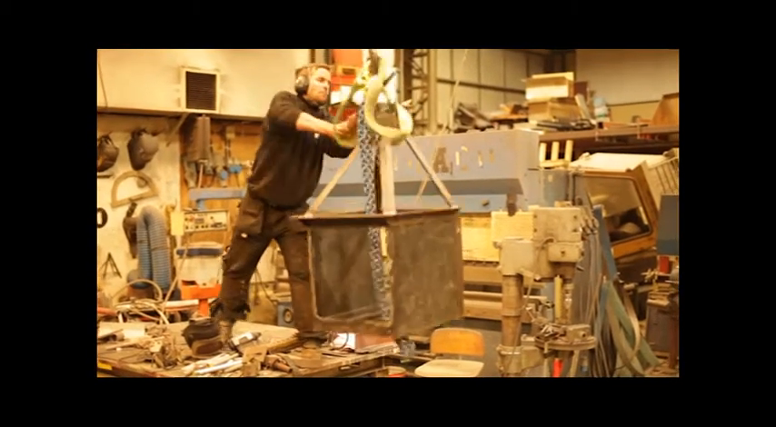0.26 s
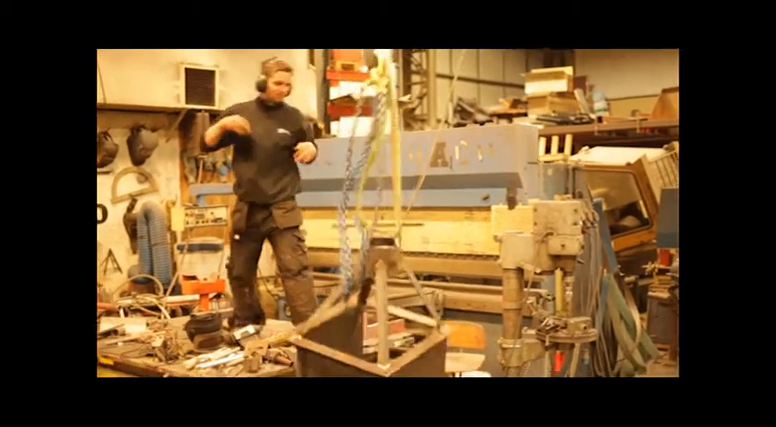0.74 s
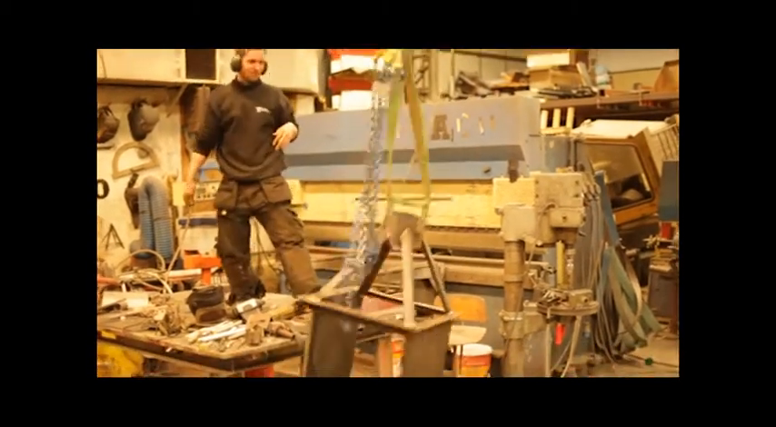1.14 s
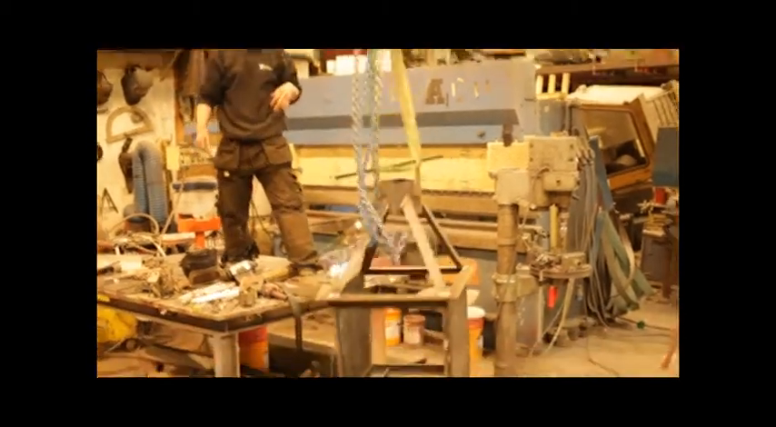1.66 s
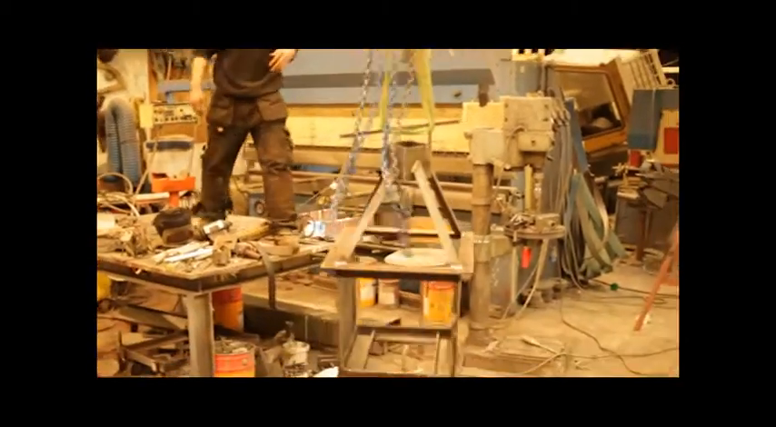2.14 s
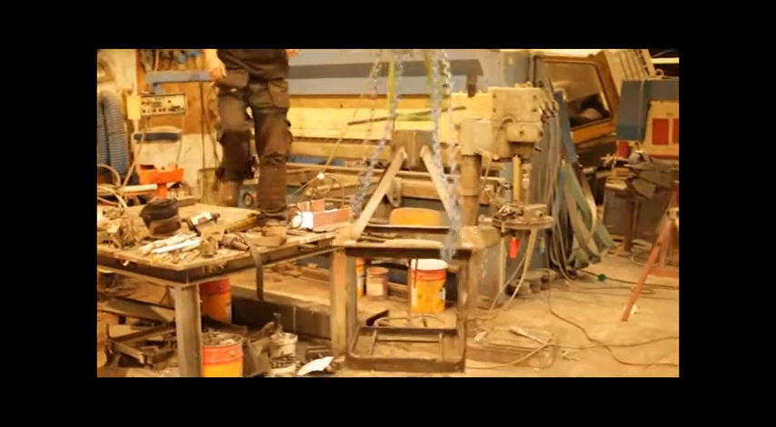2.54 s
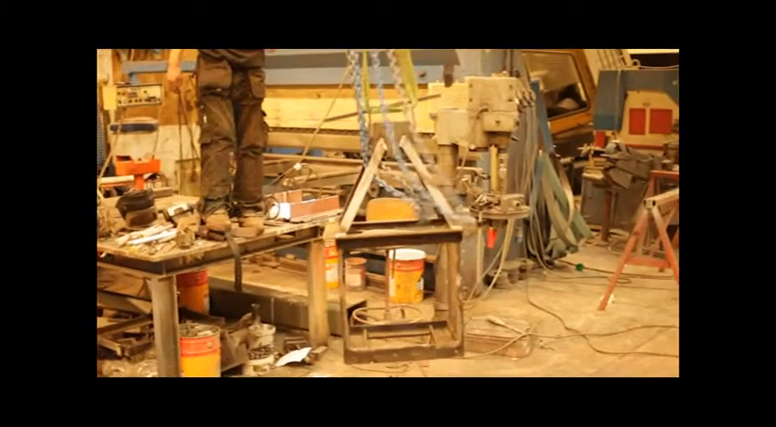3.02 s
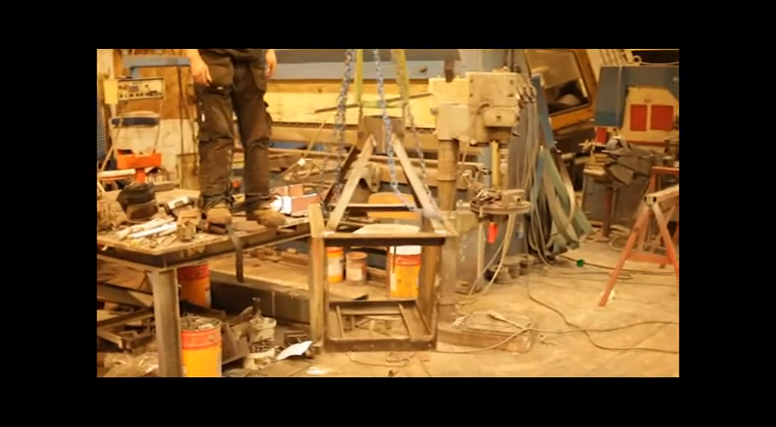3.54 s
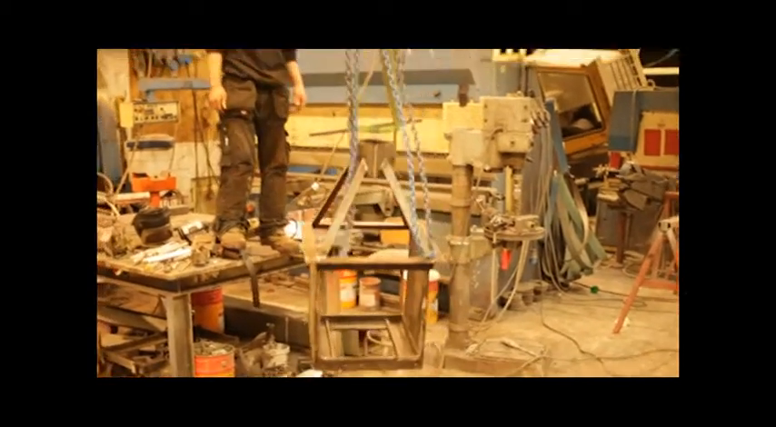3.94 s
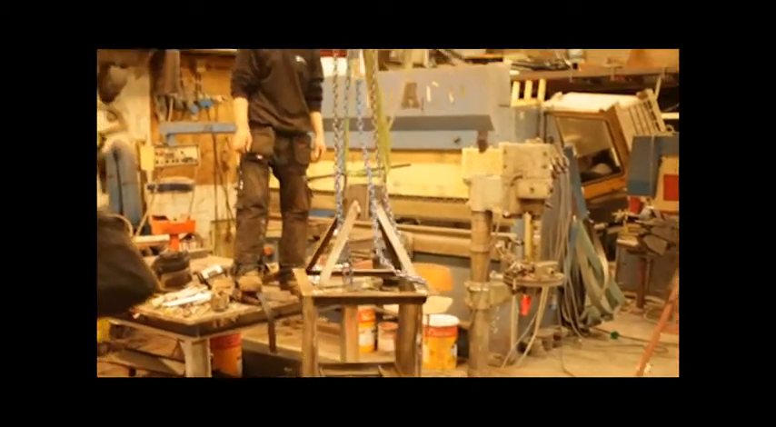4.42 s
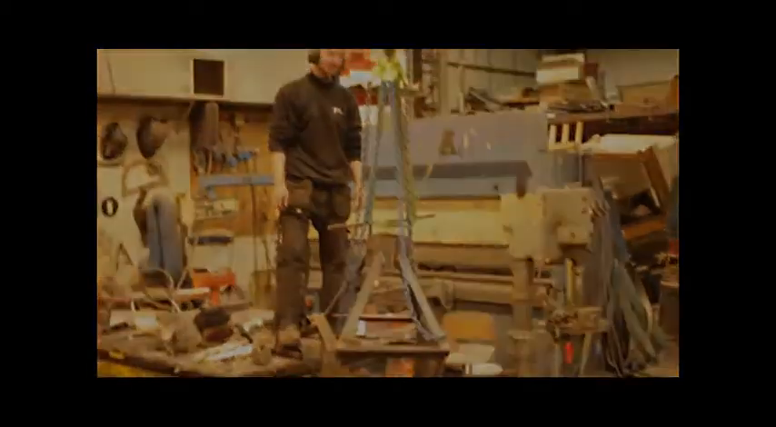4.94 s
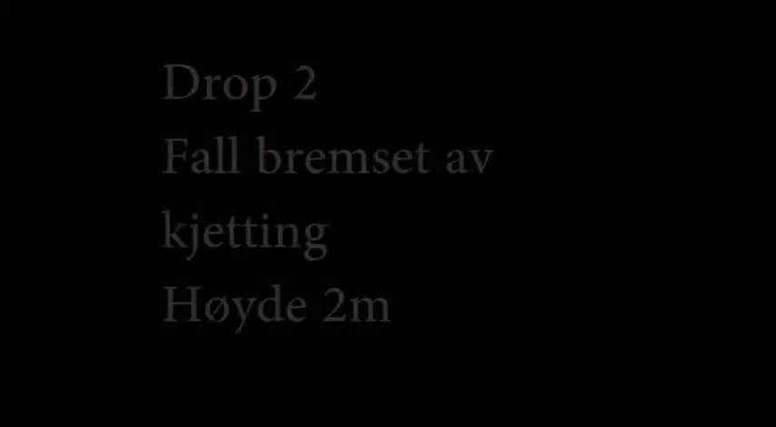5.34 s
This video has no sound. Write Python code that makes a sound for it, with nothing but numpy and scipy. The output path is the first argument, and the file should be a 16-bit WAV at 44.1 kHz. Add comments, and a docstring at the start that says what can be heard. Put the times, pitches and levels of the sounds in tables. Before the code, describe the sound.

Sharp clanks, jingling chain links and hollow booms come from a dropped steel frame swinging on its chain in an echoing workshop.

```python
"""First you hear loose chain links rattle and a low boom: a welded steel frame has dropped from a crane
hook and swings on its chain in a metal workshop. Heavy blows boom in its panels, bunches of links slap
it and make it ring, and the hook gives one short squeak. Single links tick, a shackle clinks with clear
high tones, and near the end a loose bar rings on. The hall echoes the blows, machines hum far off,
and the sound is faded out."""
import sys
import numpy as np
from scipy import signal
from scipy.fft import rfft, irfft, next_fast_len
from scipy.io import wavfile
from scipy.ndimage import map_coordinates

SR = 44100
rng = np.random.default_rng(int(sys.argv[2]) if len(sys.argv) > 2 else 0)


def transcribe(signal):
    """Save signal, clipped to [-1, 1], as a 16-bit WAV file at the path in sys.argv[1]."""
    frames = np.atleast_2d(signal).T
    limited = np.clip(frames, -1, 1)
    pcm = np.round(limited * 32767).astype(np.int16)
    wavfile.write(sys.argv[1], SR, pcm)


N = 245769
TIME = np.arange(N) / SR

# How hard the loose links swing. Each row: time in seconds, level in dB.
RATTLE_LEVELS = [(0, -38), (.2, -44.5), (.34, -25.5), (.45, -35.5), (.56, -25), (.74, -34), (.85, -40),
                 (1.3, -29), (1.68, -31.5), (1.9, -43.5), (2.2, -33), (2.8, -37), (3.0, -48.5), (3.2, -33),
                 (3.5, -43.5), (4.3, -41), (4.6, -49), (4.85, -41.5), (5.0, -61), (5.3, -54.5)]
# The tone of one link touching steel. Each row: frequency in Hz, level in dB.
LINK_SPECTRUM = [(300, -56.5), (600, -32.5), (1100, -14), (1350, -4), (2000, -10), (2600, -4.5), (4000, -5),
                 (5200, 1.5), (7000, 2.5), (8400, -2.5), (9300, -8.5), (12000, -22), (14500, -24),
                 (16000, -38)]
# The frame's modes, the tones it rings at. A ring time is how long a tone takes to fall by 60 dB.
# Each row: pitch in Hz, level in dB, ring time in seconds before it is shortened.
FRAME_MODES = [(600, -26, .2), (690, -26, .2), (1030, -24, .2), (1280, -16, .2), (1400, -15, .15),
               (1570, -16, .15), (1930, -15, .15), (2170, -11, .25), (2585, -10, .17), (2832, -10, .17),
               (3100, -11, .1), (3470, -8, .15), (3578, -7, .18), (4200, -7, .12), (4291, -5, .2),
               (4829, -6, .18), (5040, -7, .12), (5200, -8, .12), (5360, -6, .15), (5670, -6, .12),
               (6200, -6, .1), (6610, -5, .1), (7165, -5, .1)]
# The modes of the frame's side panels. Each row: pitch in Hz, width in Hz, level in dB.
PANEL_MODES = [(446.7, 16, -1.5), (563.4, 15, -2), (557, 95, -13), (697, 71, -3), (944, 83, -10),
               (1348, 250, -5.5)]
# The drone of far machines. Each row: frequency in Hz, level in dB.
DRONE_SPECTRUM = [(15, -34.5), (25, -27.5), (92, -0.5), (151, 7.5), (437, 12), (487, -19.5), (743, 3.5),
                  (845, 6.5), (1010, 13.5), (1130, -16), (1240, -13.5), (1580, 0.5), (2000, -9),
                  (2600, -32.5), (4400, -120)]
# Narrow bands of hum in that drone. Each row: pitch in Hz, width in Hz, level in dB.
HUM_BANDS = [(47.2, 9.5, -2), (99.8, 23, 0.5)]
# Heavy blows on the panels. Each row: start in seconds, level in dB, level of the lowest mode in dB.
THUMPS = [(0.009, -35, -3), (0.089, -34.5, 2), (0.289, -30, -19), (0.349, -24, 1.5), (0.499, -24, -20),
          (0.549, -24, -5), (0.749, -31, -9), (1.309, -35, -2), (1.556, -42.5, 15), (1.888, -36, 0),
          (2.363, -40, -3), (4.484, -33.5, -13), (4.539, -35, -1.5), (4.81, -40, -10), (5.015, -64, 9)]
# How long the hall echoes. Each row: frequency in Hz, ring time in seconds.
HALL_RING_TIMES = [(300, 0.95), (2000, 0.56), (6000, 0.38), (9000, 0.29), (16000, 0.38)]
# Bunches of links hitting the frame. Each row: start in seconds, level in dB, treble boost in dB,
# boost of the frame's low knock in dB, rise time in milliseconds, fall time in milliseconds.
SLAPS = [(0.071, -26, 6.5, 5, 0.83, 40), (0.184, -24, -10, 1.5, 2, 22), (0.209, -18, 4, -4, 1.6, 31),
         (0.224, -12, -15, -2, 1.3, 8), (0.271, -13.5, 3, 5, 1, 8.6), (0.355, -15.5, -0.5, 12, 2, 23),
         (0.381, -9.5, 7, -25, 0.91, 9), (0.464, -28.5, 7, -25, 2, 15), (0.499, -16.5, -17, -24, 2, 10),
         (0.521, -19.5, 0, -22, 11, 90), (0.577, -18.5, -0.5, 5, 0.6, 95), (0.598, -22.5, 6, 4.5, 1.3, 15),
         (0.642, -8.5, 5, -5.5, 0.93, 4.9), (0.663, -16.5, 2, -1.5, 2, 64), (0.707, -31, 0.5, 23.5, 3, 8),
         (0.832, -21, -10, -2.5, 4.2, 44), (0.878, -18.5, 7, 3.5, 4, 12), (0.951, -30, 8, 2.0, 2, 150),
         (1.012, -12.5, 7, -9, 2, 6), (1.036, -23, -6, 4, 2.3, 21), (1.169, -17, -9, -6, 1.3, 13),
         (1.199, -20, -7, 10, 2, 13), (1.232, -20, -10, -9, 1.8, 23), (1.257, -16, 2.5, -12.5, 2.4, 6.2),
         (1.305, -15, 6.5, 0.5, 0.85, 28), (1.36, -16, 14, -17, 4, 11.6), (1.434, -17.5, 10, 0.5, 2, 9.7),
         (1.48, -18.5, 17.5, -1, 2, 9.4), (1.557, -20, 4.5, -18, 6.1, 17), (1.853, -33, 1, 23, 2.8, 16),
         (1.89, -6, -11, -2.5, 2.2, 5.5), (1.899, -26, -1, -7, 2, 3.9), (2.034, -13.5, 10.5, -6.0, 6.6, 20),
         (2.083, -18.5, 18.5, 5, 3.1, 17), (2.104, -14.5, 4, 4, 1.1, 12.7),
         (2.318, -15, -2.5, 3, 1.7, 18.6), (2.362, -14, 1.5, 6, 1.2, 22), (2.39, -15, -6, 5, 1.5, 13.4),
         (2.418, -11.5, -10.5, -19.5, 3.6, 6.8), (2.44, -15.5, 5, 7.5, 2, 25),
         (2.658, -14.5, 12, -4, 3, 10), (2.689, -16, -6.5, -1.5, 2.7, 20), (2.71, -17.5, 8, 0, 2.4, 13),
         (2.817, -23.5, 9.5, -4, 4.1, 11.6), (2.941, -23, -19, -7.5, 2.7, 13),
         (2.961, -31, -11.5, 11.5, 5.1, 38), (3.062, -12.5, -9, 0, 0.96, 16.6),
         (3.087, -18.5, 11.5, 3, 0.72, 14), (3.11, -13, -2, 3.5, 1.1, 8.4),
         (3.199, -28.5, 15, 5.5, 2.2, 46), (3.248, -22.5, 4, 0, 14, 24), (3.278, -30, -4, 20.5, 2, 20),
         (3.359, -29, 4, 0, 1.8, 5.8), (3.483, -16, -10, -19, 4.9, 17), (3.49, -17, 7, -4, 2.1, 15),
         (3.508, -13.5, 1, -9.5, 2.2, 9.7), (3.58, -26.5, -8, 12.0, 4.1, 22),
         (3.921, -26.5, -8.5, -1, 1.8, 48), (3.939, -23, -15.0, -15, 1.7, 11),
         (3.983, -18.5, 3, -15.5, 5.6, 23), (4.009, -13.5, -3, 7.5, 0.46, 6), (4.19, -17, -8, 1.0, 6, 25),
         (4.227, -10.5, 9, -7, 0.52, 12.2), (4.378, -28.5, 21, 5, 2, 24), (4.482, -28, 3, 3, 1.6, 15),
         (4.516, -27.5, 19.5, -36, 3.4, 21), (4.544, -29.5, 6, 11, 2, 24), (4.759, -28.5, 8, -23, 4.4, 16),
         (4.79, -26, -27, 0, 4.5, 17), (5.015, -45, 0, 18, 2, 3.9), (5.156, -48.5, -20, 22, 2, 28),
         (5.248, -19, -24, -2, 0.88, 13.6), (5.274, -14.5, -3, -14, 2, 16)]
# Single links ticking. Each row: start in seconds, level in dB.
TICKS = [(0.365, -11), (0.579, -12.5), (0.9702, -21), (1.0794, -23), (1.254, -15.5), (1.454, -22.5),
         (1.5444, -15), (1.7918, -38.5), (1.8685, -20), (1.89, -13), (2.0594, -22), (2.2394, -25.5),
         (2.2994, -23.5), (2.3828, -11.5), (2.514, -23.5), (2.5945, -32), (3.066, -6), (3.072, -5),
         (3.0893, -9), (3.1144, -18), (3.159, -13), (3.2244, -13), (3.3553, -32), (3.9878, -21),
         (4.0114, -21), (4.7257, -42), (4.995, -45)]
# The bright tone of a tick. Each row: frequency in Hz, level in dB.
TICK_SPECTRUM = [(2000, -34.5), (6000, -8.5), (9000, 0.5), (13000, -13), (16000, -25.5)]
# Blows on the shackle. Each row: start in seconds, level in dB, boost of the low modes in dB,
# boost of the high modes in dB, how freely it hangs from 0 to 1.
CLINKS = [(0.521, -23, -2, -6, 0.9), (0.8655, -19, -13, -4, 1), (1.1054, -20.5, -13, 9, 0.84),
          (1.1223, -18, 0, -3, 1), (1.361, -9, -4, -5.5, 0.16), (1.4825, -17, -27, -17, 0.4),
          (1.5574, -20.5, 6, 1.5, 1), (2.283, -19, -19, -6, 0.3), (2.6593, -16, -2, -9.5, 1),
          (2.817, -31.5, -10.5, 3, 0.8), (3.17, -27.5, -10, 5, 1), (3.1994, -22, 1, -22, 1),
          (3.4069, -27.5, 2.5, -4, 0.8), (3.8303, -15.5, 3.5, -2, 0.81), (4.0794, -33, -22, 0.5, 0.85),
          (4.3779, -24.5, -3, -10, 0.94), (4.4818, -25, 3, -4, 0.56), (4.6665, -36, 5.5, -15, 0.9),
          (4.894, -40.5, 8.5, 1, 0.49)]
# The shackle's modes. Each row: pitch in Hz, level in dB, ring time in seconds before a blow scales it.
SHACKLE_MODES = [(2810, -12, .1), (4285, -15, .5), (5012, -10, .1), (5163, -4, .15), (5358, -8, .3),
                 (7330, -6, .2), (7843, -3, .2), (7865, -2, .33), (8320, -4, .2), (10440, -14, .15),
                 (11060, -14, .17), (11810, -16, .15), (12070, -12, .15), (12900, -16, .24),
                 (14110, -19, .15), (14690, -21, .13)]
# A filter that cuts the deep bass from the steel sounds. Each row: frequency in Hz, gain in dB.
BASS_CUT = [(20, -34), (150, -8), (300, -1)]

LOWEST_MODE_HZ, LOWEST_MODE_WIDTH_HZ = 257.1, 16  # the deepest tone of the panels
SHAKEN_DB, SHAKEN_RING_S = -21.5, 0.38  # links shaken loose: level compared with the slap, ring time
PUSH_FALL_S, PUSH_TOP_HZ = 0.02, 800  # the push of a heavy blow is short and dull
FADE_START_S, FADE_END_S, TOP_HZ = 4.985, 5.314, 15900


def amp(db):
    """Turn decibels into a number to multiply by."""
    return 10 ** (np.asarray(db) / 20)


def unit(x):
    """Scale a sound to an average power of 1."""
    return x / np.sqrt(np.mean(x ** 2) + 1e-20)


def along(points, hz):
    """Read between the rows of a (frequency, value) table, on a log frequency scale."""
    freqs, values = np.transpose(points)
    return np.interp(np.log(hz + 1), np.log(freqs + 1), values)


def filtered(x, response):
    """Multiply each frequency in x by the gain that response gives for it."""
    size = next_fast_len(len(x) + 8192)
    return irfft(rfft(x, size) * response(np.fft.rfftfreq(size, 1 / SR)), size)[:len(x)]


def coloured(x, spectrum):
    """Shape the tone of x with a table of (Hz, dB) rows."""
    return filtered(x, lambda hz: amp(along(spectrum, hz)))


def resonances(modes, hz):
    """How strongly a set of (pitch, width, dB) modes answers at each frequency."""
    return sum((-1) ** k * amp(db) * 1j * hz * width / (pitch ** 2 - hz ** 2 + 1j * hz * width)
               for k, (pitch, width, db) in enumerate(modes))


def ringing(modes, ring_scale=1, detune=0, size=SR // 3):
    """One dying sine wave for each mode; detune shifts the pitches a little at random."""
    hz, db, ring_s = np.transpose(modes)[:, :, None]
    t = TIME[:size]
    hz = hz * (1 + detune * rng.standard_normal(hz.shape))
    return amp(db - 60 * t / np.clip(ring_scale * ring_s, .01, 1)) * np.sin(2 * np.pi * hz * t)


def wobble(per_second):
    """A smooth curve through a few random values each second."""
    return map_coordinates(rng.standard_normal(int(N * per_second / SR) + 4), [TIME * per_second])


def contacts(size, per_second, spread_db, ring_s):
    """Links touch at random moments, and each touch is a tiny burst of noise."""
    clicks = (rng.random(size) < per_second / SR) * amp(spread_db * rng.standard_normal(size))
    decay = amp(-60 * TIME[:SR // 20] / ring_s)
    power = signal.fftconvolve(clicks ** 2, decay ** 2)[:size]
    return unit(np.sqrt(np.abs(power)) * rng.standard_normal(size))


def chain_rattle():
    """Loose links keep rattling, more after each slap; the frame and its panels ring along."""
    swing = amp(np.interp(TIME, *np.transpose(RATTLE_LEVELS)))
    shaken_power = np.zeros(N)
    for start_s, db, *_ in SLAPS:
        age = np.clip(TIME - start_s, 0, None)
        shaken_power += (TIME >= start_s) * amp(db + SHAKEN_DB - 60 * age / SHAKEN_RING_S) ** 2
    touches = contacts(N, per_second=1500, spread_db=0, ring_s=.008)
    frame, step = np.zeros(N + SR), SR // 16
    for start in range(0, N, step):  # the chain keeps touching new places, which favour other modes
        strengths = amp(4 * rng.standard_normal(len(FRAME_MODES)))
        ring = strengths @ ringing(FRAME_MODES, ring_scale=.4, detune=.01, size=SR // 8)
        part = signal.fftconvolve(touches[start:start + step], ring)
        frame[start:start + len(part)] += part
    links = unit(coloured(touches, LINK_SPECTRUM)) + amp(-0.5) * unit(frame[:N])
    panel_touches = contacts(N, per_second=1800, spread_db=3, ring_s=0.038)
    panels = unit(filtered(panel_touches, lambda hz: resonances(PANEL_MODES, hz)))
    return np.sqrt(swing ** 2 + shaken_power) * links + amp(-40.5 - 4.5 * TIME) * panels


def panel_drone():
    """The lowest panel mode sounds as a narrow band of noise that wavers and slowly settles."""
    noise = rng.standard_normal(N)
    ring = filtered(noise, lambda hz: 1 / (1 + ((hz - LOWEST_MODE_HZ) / LOWEST_MODE_WIDTH_HZ) ** 2))
    return amp(-42.5 - 5.4 * TIME + 4 * wobble(5.7)) * unit(ring)


def far_machines():
    """A low drone and hum, turned unevenly up and down and slowly quieter."""
    def hum_gain(hz):
        return sum(amp(db) / (1 + ((hz - pitch) / width) ** 4) for pitch, width, db in HUM_BANDS)

    drone = unit(coloured(rng.standard_normal(N), DRONE_SPECTRUM))
    hum = unit(filtered(rng.standard_normal(N), hum_gain))
    return amp(-50 - 2 * TIME + 2.2 * wobble(8)) * (drone + amp(-4.5) * hum)


def panel_thumps():
    """A heavy blow is a soft, noisy push that makes the panels boom, each mode at a new strength."""
    out, t = np.zeros(N + SR), TIME[:SR // 3]
    for start_s, db, lowest_db in THUMPS:
        push = np.exp(-t / PUSH_FALL_S) * rng.standard_normal(len(t))
        modes = [(LOWEST_MODE_HZ, LOWEST_MODE_WIDTH_HZ, lowest_db), *PANEL_MODES]
        modes = [(pitch, width, level + 2.5 * rng.standard_normal()) for pitch, width, level in modes]
        boom = filtered(push, lambda hz: resonances(modes, hz) / (1 + 1j * hz / PUSH_TOP_HZ) ** 2)
        out[round(start_s * SR):][:len(t)] += amp(db) * boom / np.abs(boom).max() * np.sqrt(2)
    return out[:N]


def hall_echo(x):
    """The hall answers with a tail of noise in which the low tones last longest."""
    out, step, delay = np.zeros(N + 2 * SR), SR // 4, 300  # step and delay are in samples
    for start in range(0, N, step):  # every quarter second gets a new tail
        hz, t, noise = signal.stft(rng.standard_normal(SR * 3 // 4), SR, nperseg=256)
        decay = amp(-60 * t / along(HALL_RING_TIMES, hz)[:, None])
        tail = signal.istft(noise * decay, SR, nperseg=256)[1]
        echo = signal.fftconvolve(x[start:start + step], tail / np.linalg.norm(tail))
        out[start + delay:][:len(echo)] += echo
    return out[:N]


def link_ring(count, ring_s):
    """Links of many sizes ring briefly, each at its own random pitch."""
    hz = rng.uniform(2000, 13000, count)
    db = along(LINK_SPECTRUM, hz) + 2.5 * rng.standard_normal(count)
    return ringing(np.transpose([hz, db, np.full(count, ring_s)])).sum(axis=0)


def chain_slaps():
    """A bunch of links lands in a quick burst of contacts that sets the frame and the links ringing."""
    out, t = np.zeros(N + SR), TIME[:SR // 3]
    ms = 1000 * t
    for start_s, db, treble_db, knock_db, rise_ms, fall_ms in SLAPS:
        shape = (1 - np.exp(-ms / rise_ms)) * np.exp(-ms / min(fall_ms, 100))
        shape = shape / shape.max()
        burst = shape * contacts(len(t), per_second=2500, spread_db=1.5, ring_s=0.0032)
        # each place struck favours other modes of the frame
        tones = ringing(FRAME_MODES, ring_scale=.45, detune=.008)
        strengths = amp(2.5 * rng.standard_normal(len(tones))) * rng.choice([-1, 1], len(tones))
        one_hit = amp(-19) * (strengths @ tones) + amp(-22) * link_ring(count=20, ring_s=.055)
        ring = signal.fftconvolve(one_hit, burst[:SR // 20] / np.sqrt(SR * 0.0014))[:len(t)]
        slap = coloured(burst, LINK_SPECTRUM) + ring
        slap = slap * np.linalg.norm(shape) / np.linalg.norm(slap)
        # hard contacts reach higher, heavy ones shake the lower frame modes
        tilt = [(300, -6), (900, knock_db), (2200, 0), (8000, 0), (11500, treble_db)]
        out[round(start_s * SR):][:len(t)] += amp(db) * coloured(slap, tilt)
    return out[:N]


def hook_squeak(start_s=.108, length_s=.08, hz=888, db=-29):
    """The hook turns and gives one short, smooth tone."""
    swell = np.sin(np.pi * np.clip((TIME - start_s) / length_s, 0, 1)) ** 2
    return amp(db) * swell * np.sin(2 * np.pi * hz * TIME)


def link_ticks(ring_s=0.04):
    """A single link ticks with a very short burst of bright noise."""
    out, t = np.zeros(N + SR), TIME[:SR // 20]
    for start_s, db in TICKS:
        out[round(start_s * SR):][:len(t)] += amp(db - 60 * t / ring_s) * rng.standard_normal(len(t))
    return coloured(out[:N], TICK_SPECTRUM)


def shackle_clinks():
    """The shackle rings with the same clear tones at every blow, more briefly when links lean on it."""
    out, t = np.zeros(N + SR), TIME[:SR // 3]
    hz = np.array(SHACKLE_MODES)[:, 0]
    per_mode = (len(hz), 1)
    shape = (1 - np.exp(-t / 0.00059)) * np.hanning(2 * len(t))[len(t):]  # quick start, smooth end
    for start_s, db, low_db, high_db, freedom in CLINKS:
        place_db = 3.5 * rng.standard_normal(len(hz))  # the place struck favours some modes
        strengths = amp(place_db + (hz < 6000) * low_db + (hz > 9500) * high_db)
        tones = ringing(SHACKLE_MODES, freedom * rng.uniform(.6, 1.1, per_mode), detune=.0015)
        beat_hz = rng.uniform(15, 60, per_mode)  # close pairs of modes make each tone pulse
        beats = 1 + .4 * np.sin(2 * np.pi * (beat_hz * t + rng.random(per_mode)))
        out[round(start_s * SR):][:len(t)] += amp(db) * shape * (strengths @ (tones * beats))
    return out[:N]


def ringing_bar(start_s=4.79, hz=4197, db=-45, ring_s=1.8):
    """A loose bar rings on at the end with one long, thin tone."""
    age = np.clip(TIME - start_s, 0, None)
    rise = 1 - np.exp(-age / 0.011)
    return amp(db - 60 * age / ring_s) * rise * np.sin(2 * np.pi * hz * age)


def scene():
    """Mix the blows, their echo and the rattling steel over the far machines."""
    blows = chain_slaps() + shackle_clinks() + link_ticks() + panel_thumps()
    blows += hook_squeak() + ringing_bar()
    steel = blows + amp(-6) * hall_echo(blows) + chain_rattle() + panel_drone()
    return (coloured(steel, BASS_CUT) + far_machines())[None]


def record(dry):
    """Round off the loudest peaks, fade to silence and cut the very highest treble."""
    rounded = dry[0] / (1 + np.abs(dry[0] / .9) ** 3) ** (1 / 3)
    fade = np.clip((FADE_END_S - TIME) / (FADE_END_S - FADE_START_S), 0, 1) ** 1.26
    return filtered(rounded * fade, lambda hz: 1 / (1 + (hz / TOP_HZ) ** 200))[None]


dry = scene()
out = record(dry)
transcribe(out)
```